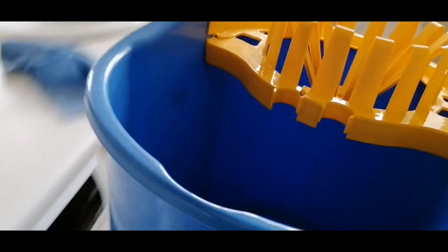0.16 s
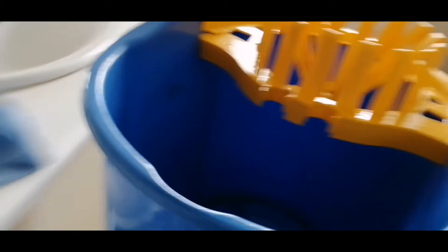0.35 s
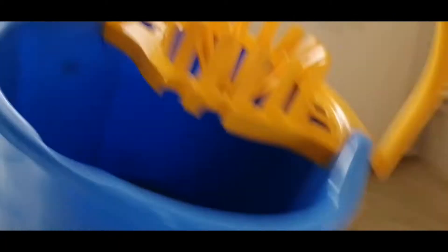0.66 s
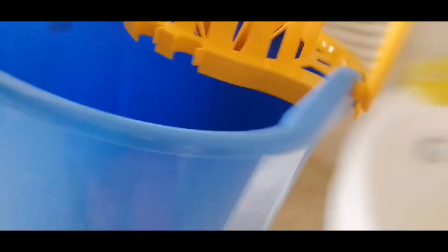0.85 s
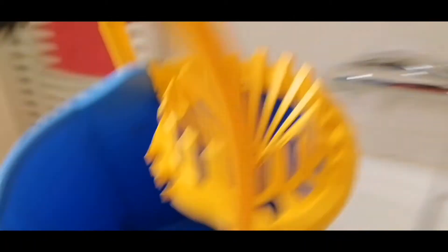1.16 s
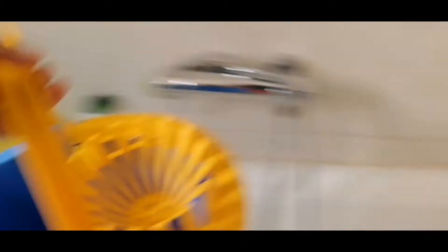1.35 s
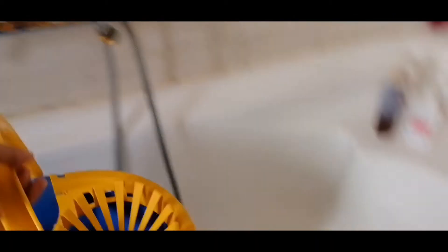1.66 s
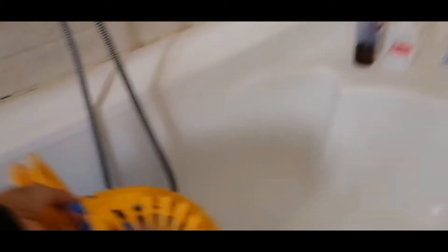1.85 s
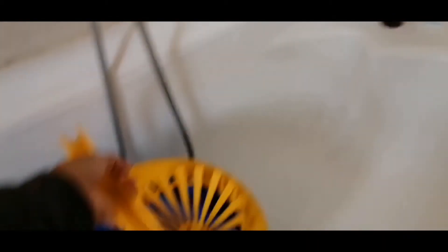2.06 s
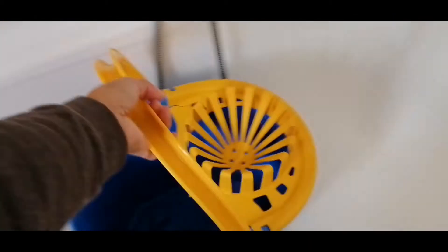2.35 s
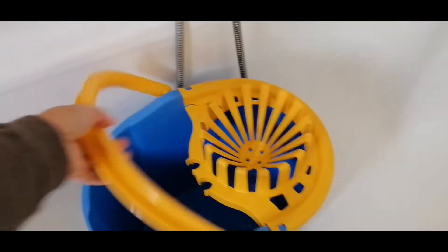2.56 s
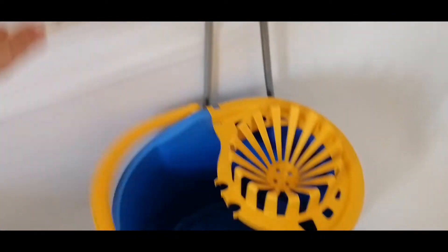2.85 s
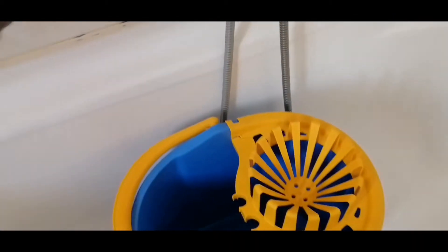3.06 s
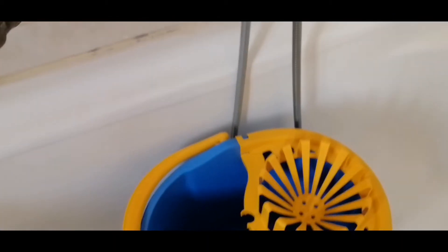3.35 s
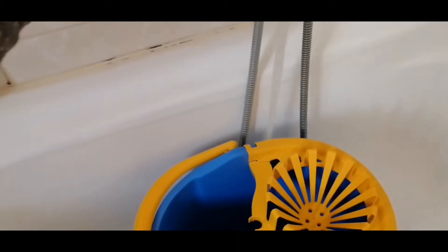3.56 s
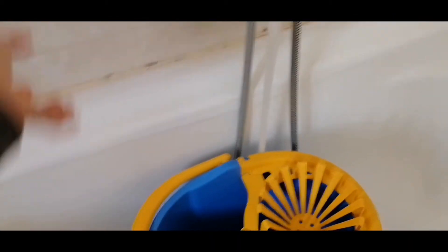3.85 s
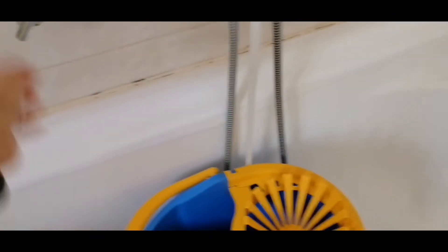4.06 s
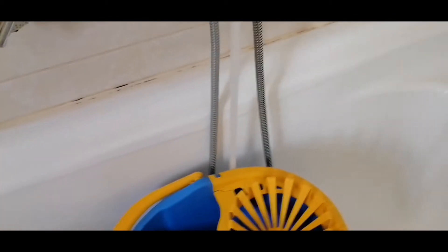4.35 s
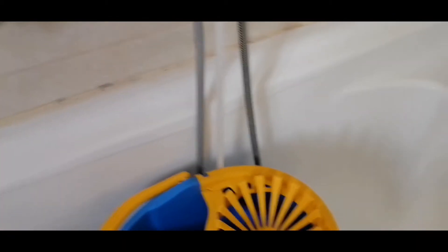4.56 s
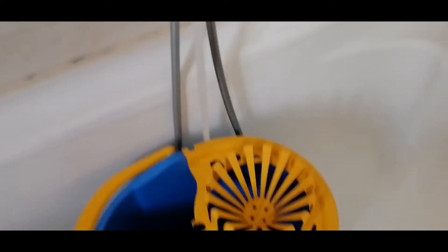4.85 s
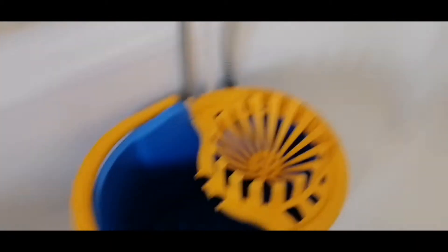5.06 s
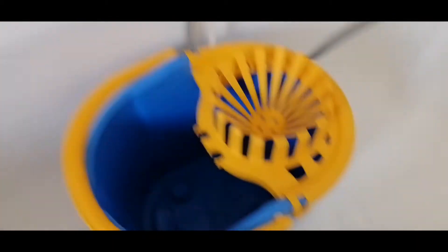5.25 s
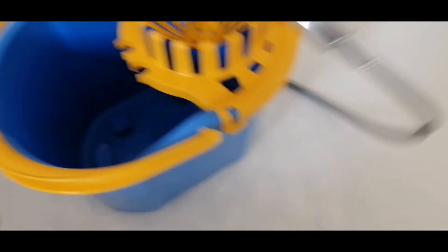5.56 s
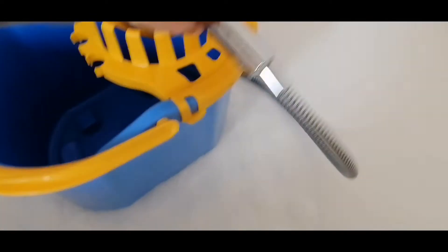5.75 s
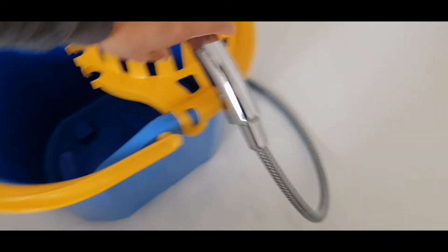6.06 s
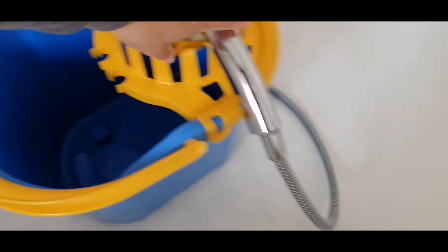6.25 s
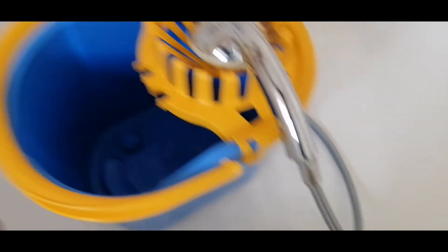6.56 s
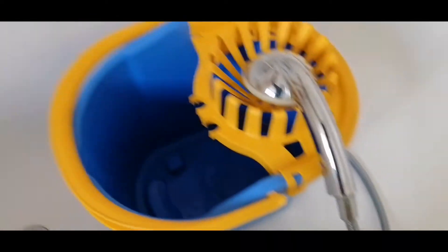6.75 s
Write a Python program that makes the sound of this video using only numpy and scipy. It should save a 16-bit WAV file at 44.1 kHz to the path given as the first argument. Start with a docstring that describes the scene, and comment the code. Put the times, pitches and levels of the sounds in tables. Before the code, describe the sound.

Hollow plastic knocks, rustling sleeves and a thin squeak, a bucket set into a booming tub, then sizzling shower spray with scrapes.

```python
"""A hand rumbles on a camera in a tiled bathroom as a plastic mop bucket is knocked and picked up, sleeves rustling.
It is bumped down into a bathtub, which booms, and its handle is dropped; each blow is a click, chatter and rings.
A tap lever clacks open and a jet of drops hisses and patters on the tub, while the bucket is shoved under
the shower hose with scrapes and a short groan. Two close microphones hear it all; the loudest blows are limited."""
import sys
import numpy as np
from scipy import signal
from scipy.fft import rfft, irfft, next_fast_len
from scipy.io import wavfile
from scipy.ndimage import uniform_filter1d, minimum_filter1d, map_coordinates

SR = 44100
rng = np.random.default_rng(int(sys.argv[2]) if len(sys.argv) > 2 else 0)


def output_pcm(signal):
    """Save a mono or channel-first signal as 16-bit PCM at the path in sys.argv[1].

    Samples are clipped to [-1, 1] before scaling.
    """
    pcm = np.clip(np.atleast_2d(signal).T, -1, 1) * 32767
    wavfile.write(sys.argv[1], SR, np.round(pcm).astype(np.int16))


N = 304290
TIME = np.arange(N) / SR  # seconds
SIDES = np.array([[.5], [-.5]])  # shares a left-minus-right level between the two microphones

# All dB columns are relative levels: each source sets its own trim.
# Hand shifts on the camera body. Each row: start in seconds, length in seconds, level in dB.
GRIP_SHIFTS = [(-0.05, 0.24, -29.5), (0.28, 0.18, -42), (3.92, 0.23, -26.5), (6.2, 0.11, -29)]
# Colour of the grip rumble. Each row: frequency in Hz, density in dB per Hz.
GRIP_COLOUR = [(12, -30), (20, 1.5), (76, 0.5), (161, -6), (195, -5.5), (269, -16.5), (350, -18),
               (460, -30), (770, -120)]
# Colour of the still room. Each row: frequency in Hz, density in dB per Hz.
HUSH_COLOUR = [(25, 24), (60, 21), (140, -27), (260, -19), (550, -22), (1200, 6), (4000, 1), (8000, -1),
               (15000, -3.5)]
# Blows on the bucket, its handle and the tap. Each row: start in seconds, first contact in dB, thump in dB,
# clack in dB, snap in dB, tick in dB, wall pitch in Hz, clack pitch in Hz, left minus right in dB,
# direct click against the echo in dB, chatter against the echo in dB, extra bass from the weight in dB.
BLOWS = [(0.012, -27, -30, -32, -45, -39.5, 284.4, 660, -3.5, -4.5, -5, 2),
         (0.099, -9, -30, -28, -35.5, -32, 339, 510, -4, 2.5, -0.5, -8),
         (0.515, -22, -33, -31, -44, -45, 320, 740, -3, 0, -8, 5),
         (0.598, 0, -32.5, -24, -21.5, -62, 292, 740, -3.5, -12, 0.5, -7),
         (1.04, -44, -31, -52, -52, -50, 264.6, 830, -3.5, -1, -3, 6.5),
         (1.083, -25, -29.5, -30, -48, -47, 286, 584, -3, -7, -10, -19),
         (1.15, -26, -47, -42, -32, -58, 326, 587, -3.5, -8, -8, 0),
         (1.657, -13, -9, -20, -22, -16, 275.2, 450, 1, -21, -5.5, 4.5),
         (2.136, -16, -17.5, -14, -27, -35, 261, 1050, 4, -17, 11, 17.5),
         (2.151, -6, -17, -8.5, -12.5, -23, 296, 790, 2.5, -8, 6, 7.5),
         (2.499, -13, -12, -11, -13, -18, 307, 1000, -2.5, -17, 6, 7),
         (2.961, -63, -63, -35.5, -40, -70, 288, 880, -3, 1, 1, 0),
         (3.016, -11, -9.5, -16, -17, -13, 263.5, 900, -0.5, -10, 5.5, -8.5),
         (3.294, -19, -28, -35, -36.5, -35.5, 264, 536, -2.5, -12, -1.5, -24),
         (3.456, -30, -63, -36, -54, -52, 312, 482, -3, -3, 0, -22),
         (3.502, -19, -41, -23, -20.5, -33, 274, 1010, 1, -7, 7, -14),
         (5.164, -19, -27.5, -30.5, -28, -26, 345, 573, 0, -10, 4, -3.5),
         (5.244, 2.5, -52, -20, -26.5, -36, 300, 870, 3, -17, 6, 1),
         (5.829, -24, -23.5, -27.5, -53, -38, 284, 604, -3, -13, -8, 1)]
# What a blow sets ringing, from the whole body (thump) to the hard edge (tick).
# Each row: frequency in Hz, density in dB per Hz.
THUMP_COLOUR = [(30, -9), (80, -3), (120, -1.5), (260, 3), (420, -7.5), (650, -8.5), (1500, -61)]
CLACK_COLOUR = [(250, -35), (480, 10), (750, 4), (1150, 4.5), (1600, 0), (2600, -48)]
SNAP_COLOUR = [(900, -46.5), (1700, 2), (2300, 3), (3100, 6.5), (3900, -7), (5000, -6), (8000, -72)]
TICK_COLOUR = [(2500, -13), (4200, -0.5), (5300, 3), (7200, 1.5), (10000, -3), (15000, -14)]
# Lasting rings of the bucket in the tub. Each row: frequency in Hz, level in dB, 60 dB decay in seconds.
BUCKET_MODES = [(113.4, -14.5, 1.2), (147.8, -15, 1.1), (182, -5.5, 1), (221.2, -6, 1.08), (269.5, -12, 1),
                (331, -7, 0.62), (364, -16.5, 1.26), (401, -12.5, 0.68), (574, -15, 0.82), (643, -21, 0.83),
                (684, -17, 0.84), (766, -9, 0.8), (873, -17.5, 0.55), (1032, -13.5, 0.63), (1110, -12, 0.7),
                (1220, -18, 0.42), (1332, -19, 0.97)]
# Sleeve and hand rubbing, and the bucket's base sliding as it lands.
# Each row: start in seconds, length in seconds, low rub in dB, swish in dB.
RUBBING_STROKES = [(0.257, 0.19, -33.5, -33), (0.423, 0.27, -32, -35.5), (1.145, 0.13, -55, -34),
                   (1.365, 0.31, -30, -38), (1.664, 0.034, -40, -16), (1.957, 0.22, -62, -28.5)]
# Colours of the low rub and of the swish. Each row: frequency in Hz, density in dB per Hz.
RUB_COLOUR = [(80, -16), (200, -1.5), (370, 1.5), (600, -7.5), (900, -16), (1900, -20), (2800, -15.5),
              (3600, -25), (6000, -48)]
SWISH_COLOUR = [(1500, -12), (2700, -7), (4000, -7.5), (5700, 0.5), (6300, -1.5), (7200, -1.5), (8300, -6),
                (10500, -11.5), (15000, -16)]
# The rocking bucket lands its weight on the tub floor. Each row: start in seconds, level in dB.
TUB_LANDINGS = [(1.65, -31), (1.76, -21.5), (2.13, -18), (2.28, -16), (2.56, -22), (2.74, -22.5),
                (3.08, -24), (5.15, -19), (5.85, -22.5)]
# The bucket slides on enamel. Each row: start in seconds, length in seconds, level in dB.
DRAGS = [(2.56, 0.2, -22.5), (4.87, 0.17, -36), (5.16, 0.072, -28), (5.67, 0.11, -24.5)]
# Colour of the scrape. Each row: frequency in Hz, density in dB per Hz.
SCRAPE_COLOUR = [(90, -20), (190, -9), (290, -1), (400, -10.5), (580, -5.5), (900, -16), (1400, -18.5),
                 (3200, -22), (6000, -50)]
# Colours of the fine drops, the heavy drops, and the air and water leaving the spout.
# Each row: frequency in Hz, density in dB per Hz.
SPRAY_COLOUR = [(2500, -25), (4100, -8), (5000, -1), (6000, 0), (8300, 0), (10000, -2.5), (12000, -6.5),
                (15000, -7.5)]
PATTER_COLOUR = [(120, -28), (250, -18), (400, -12), (560, -10), (700, -14.5), (820, -8.5), (1200, -9.5),
                 (1600, -9), (2200, -4.5), (2800, 1.5), (3300, 3.5), (3900, -1.5), (5000, -7.5),
                 (7000, -43)]
SPLUTTER_COLOUR = [(200, -23), (420, 5), (1100, -4), (1800, -6), (4000, -35)]
# Where the jet stands. Each row: time in seconds, left minus right in dB.
JET_SIDES = [(3.5, 2), (4.6, 1.1), (5.5, -0.5), (6.9, -1.8)]
# How long the tiled room rings. Each row: frequency in Hz, 60 dB decay in seconds.
TILE_DECAY = [(60, 2.04), (130, 0.9), (350, 0.71), (920, 0.79), (2500, 0.71), (6400, 0.61), (14000, 0.3)]
# How alike the two microphones hear. Each row: frequency in Hz, left-right likeness from 0 to 1.
LIKENESS = [(60, 0.52), (280, 0.93), (600, 0.16), (1200, 0), (4000, 0.037)]
# Resonances of the microphone ports. Each row: centre in Hz, half width in Hz, left in dB, right in dB.
PORT_RESONANCES = [(250, 610, 2, -2), (3080, 190, 0.5, -1.5), (5340, 34, 5.5, 6), (7100, 150, 4.5, -2),
                   (7160, 594, -2.5, 12), (8240, 1280, 7, -2), (15300, 540, 3, 3)]


def amp(db):
    """Decibels to gain."""
    return 10 ** (np.asarray(db) / 20)


def unit(x):
    """Scale to rms 1."""
    return x / np.sqrt(np.mean(x ** 2) + 1e-20)


def along(points, hz):
    """(Hz, value) points read on a log frequency axis."""
    f, v = np.transpose(points)
    return np.interp(np.log(hz + 1), np.log(f + 1), v)


def since(start):
    """Seconds since start for each sample, 0 before it."""
    return np.maximum(TIME - start, 0)


def wobble(rate):
    """A smooth random curve with this many knots a second."""
    knots = rng.standard_normal(int(N * rate / SR) + 4)
    return map_coordinates(knots, [np.arange(N) * rate / SR])


def filtered(x, response):
    """x times a response of frequency, with silence appended against wrap-around."""
    n = x.shape[-1]
    m = next_fast_len(n + 8192, real=True)
    spectrum = rfft(x, m) * response(np.fft.rfftfreq(m, 1 / SR))
    return irfft(spectrum, m)[..., :n]


def causal(gain):
    """The minimum-phase response with this gain."""
    cepstrum = irfft(np.log(gain + 1e-6))
    half = len(cepstrum) // 2
    folded = np.r_[cepstrum[0], 2 * cepstrum[1:half]]
    return np.exp(rfft(folded, len(cepstrum)))


def diffuse(pair):
    """Two unrelated signals as two close microphones hear them: alike mostly in the low range."""
    def mid_side(hz):
        turn = np.arccos(np.clip(along(LIKENESS, hz), -1, 1)) / 2
        return np.array([np.cos(turn), np.sin(turn)])
    mid, side = filtered(pair, mid_side)
    return np.array([mid + side, mid - side])


def coloured(pair, spectrum):
    """A diffuse stereo sound of rms 1 with this spectrum."""
    return unit(filtered(diffuse(pair), lambda hz: amp(along(spectrum, hz))))


def noise():
    """Two unrelated white noises."""
    return rng.standard_normal((2, N))


def grains(rate, spread_db):
    """Tiny impacts of uneven size at random moments, about rate a second, rms 1."""
    happens = rng.random((2, N)) < rate / SR
    return unit(happens * noise() * amp(spread_db * noise()))


def strokes(rows, swell, t60):
    """Gain of (start s, length s, dB) movements: each swells for a share of its length, holds and dies away."""
    power = 0
    for start, length, db in rows:
        rise = np.minimum(since(start) / (swell * length), 1)
        power = power + (amp(db - 60 * since(start + length) / t60) * rise) ** 2
    return np.sqrt(power)


def room_tail():
    """A fresh one-second stereo echo of the tiled room, energy 1 a side; each band decays at its own rate."""
    hz, t, z = signal.stft(rng.standard_normal((2, SR)), SR, nperseg=256)
    decay = amp(-60 * t / along(TILE_DECAY, hz)[:, None])
    tail = signal.istft(z * decay, SR, nperseg=256)[1][:, :SR]
    return unit(diffuse(tail)) / np.sqrt(SR)


def with_echo(x, wet_db):
    """x and the room's answer to it, scaled to keep the total power."""
    echo = signal.fftconvolve(x, room_tail(), axes=1)[:, :N]
    return (x + amp(wet_db) * echo) / np.hypot(1, amp(wet_db))


def background(grip_db=-1, hush_db=-52):
    """Fingers rumble on the camera body over the faint hush of the room: both are shaped noise."""
    grip = strokes(GRIP_SHIFTS, swell=0.15, t60=0.3) * coloured(noise(), GRIP_COLOUR)
    return amp(grip_db) * grip + amp(hush_db) * coloured(noise(), HUSH_COLOUR)


def excitation(t, click_db, chatter_db, chatter_t60=0.11, echo_delay=0.0054):
    """A direct click, a short chatter of loose plastic, and the nearest walls answering a few ms later."""
    chatter = diffuse(rng.standard_normal((2, SR))) * amp(-60 * t / chatter_t60)
    echo = room_tail() * np.clip(t / echo_delay - 1, 0, 1)
    return amp(click_db) * (t == 0) + amp(chatter_db) * chatter / np.linalg.norm(chatter[0]) + echo


def bucket_rings(t, thump, clack, heavy, modes_db=-3, detune=0.00827):
    """Decaying modes of the bucket: soft, heavy blows feed the low ones, hard blows the upper ones."""
    hz, db, t60 = np.transpose(BUCKET_MODES)
    fading = amp(db[:, None] - 60 * t / t60[:, None])
    # the bucket sits a little differently at each blow, which shifts its modes
    shifted_hz = hz * (1 + detune * rng.standard_normal(len(hz)))
    rings = np.sin(2 * np.pi * np.outer(shifted_hz, t)) * fading
    force = amp(modes_db + np.where(hz < 500, thump, clack) + heavy(hz) + rng.normal(0, 1.0, len(hz)))
    return (force * rng.choice([-1, 1], len(force))) @ rings


def knocks(direct_db=-8, chatter_db=-3, wall_db=-1, wall_t60=0.65,
           thump_db=-1, clack_db=-1, snap_db=-1, tick_db=-5,
           focus_db=7, focus_width=0.24, crack_db=4, crack_time=0.00018, start_delay=0.0015):
    """Each blow is a click, a short chatter of loose plastic, the ringing bucket and the room's answer."""
    out, t = np.zeros((2, N + 2 * SR)), np.arange(SR) / SR
    early = slice(SR // 25)  # the first 40 ms set the level of each part
    for s, peak, thump, clack, snap, tick, wall_hz, clack_hz, pan, click, loose, weight in BLOWS:
        def heavy(hz):  # the whole bucket's mass behind a blow changes the bass, in dB
            return weight / (1 + (hz / 180) ** 6)

        def spot(hz):  # the spot that is struck has a broad resonance of its own, in dB
            return focus_db / (1 + (np.log((hz + 1) / clack_hz) / focus_width) ** 2)

        blow = excitation(t, direct_db + click, chatter_db + loose)
        wall = amp(thump + wall_db) * np.sin(2 * np.pi * wall_hz * t) * amp(-60 * t / wall_t60)
        onset = 1 - np.exp(-t / 0.00054)
        hit = (wall + bucket_rings(t, thump, clack, heavy)) * onset
        for spectrum, db in ((THUMP_COLOUR, thump + thump_db), (CLACK_COLOUR, clack + clack_db),
                             (SNAP_COLOUR, snap + snap_db), (TICK_COLOUR, tick + tick_db)):
            part = filtered(blow, lambda hz: causal(amp(along(spectrum, hz) + spot(hz) + heavy(hz))))
            hit = hit + amp(db) * part / part[:, early].std()
        # first contact: one sharp push and pull of air
        u = t / crack_time
        hit = hit + amp(peak + crack_db) * u * (2 - u) * np.exp(-u)
        # each blow sounds a fixed short time after its listed start
        begin = round((s + start_delay) * SR)
        out[:, begin:begin + SR] += hit * amp(pan * SIDES)
    return out[:, :N]


def squeak(level_db=-27, start=1.465, rise=0.026, t60=0.72, top_hz=5600,
           climb_hz_per_s=7100, sag_hz_per_s=2700, rough=0.0203, catch_db=3.5, catch_hz=19.0):
    """A thin, rough squeak from one quick stroke climbs to its top pitch, then sags and fades."""
    t, past_top = since(start), since(start + rise)
    climb = climb_hz_per_s * np.maximum(rise - t, 0)
    sag = sag_hz_per_s * np.minimum(past_top, t60)
    pitch = (top_hz - climb - sag) * (1 + rough * np.array([wobble(1000), wobble(1000)]))
    catch = catch_db * np.cos(2 * np.pi * catch_hz * (t - rise))  # the surface grips in waves
    gain = amp(level_db + catch - 60 * past_top / t60) * np.minimum(t / rise, 1)
    return gain * np.sin(2 * np.pi * np.cumsum(pitch, axis=1) / SR)


def rubbing(swish_db=-1, catch_db=2):
    """Sleeve, hand and the landing base rub: shaped noise below, fine grains above, and a thin gliding squeak."""
    start, length, low, high = np.transpose(RUBBING_STROKES)
    low_gain = strokes(zip(start, length, low), swell=0.5, t60=0.22)
    high_gain = strokes(zip(start, length, high), swell=0.5, t60=0.22)
    catch = unit(amp(catch_db * wobble(45.55)))  # the rubbing surfaces catch and let go
    rub = low_gain * coloured(noise(), RUB_COLOUR)
    swish = amp(swish_db) * high_gain * coloured(grains(rate=8000, spread_db=2), SWISH_COLOUR)
    return with_echo(catch * (rub + swish), wet_db=-9) + with_echo(squeak(), wet_db=-6)


def tub(boom_db=2, boom_hz=59.4, rise=0.033, t60=1.14, waver=0.14, beat_hz=9, beat_depth=0.29):
    """The lowest mode of the tub floor swells after each landing and rings on, beating with a close second mode."""
    power = 0
    for s, db in TUB_LANDINGS:
        t = since(s)
        power = power + (amp(db - 60 * t / t60) * (1 - np.exp(-t / rise))) ** 2
    phase = 2 * np.pi * boom_hz * TIME + waver * wobble(11)  # radians
    second_mode = beat_depth * np.sin(phase + 2 * np.pi * beat_hz * TIME)
    return amp(boom_db) * np.sqrt(power) * unit(np.sin(phase) + second_mode)


def drag(scrape_db=-2):
    """The base scrapes over the enamel in small slips."""
    slips = coloured(grains(rate=1100, spread_db=0), SCRAPE_COLOUR)
    sliding = strokes(DRAGS, swell=0.36, t60=0.35)
    return with_echo(amp(scrape_db) * sliding * slips, wet_db=-6.5)


def drops(rate, spread_db, clumps, wet_db, wash_db, spectrum):
    """Drops at the heart of the jet share one echo; those that scatter merge into a smooth wash."""
    heart = with_echo(grains(rate, spread_db) * clumps, wet_db)
    return coloured(heart + amp(wash_db) * noise(), spectrum)


def water(tap_s=3.505, travel_s=0.34, spray_db=-17, patter_db=-25, splutter_db=-31):
    """The jet breaks into thousands of drops a second: fine ones sizzle, heavy ones patter on the tub."""
    t = since(tap_s)
    closed = np.maximum(1 - t / travel_s, 0)  # the flow swells to full while the lever travels
    spurt = 6.5 * amp(-60 * t / 0.33)  # dB: the pent-up pressure gives a first spurt
    nearing = 0.5 * t  # dB: the camera leans in and the spray grows
    spray = amp(spray_db - 14.5 * closed + spurt + nearing + 0.38 * wobble(13))
    patter = amp(patter_db - 10.5 * closed + spurt + 0.5 * wobble(18))
    clumps = amp(1.38 * wobble(60))  # the jet arrives in uneven slugs
    fine = drops(6000, 1, clumps, wet_db=-2, wash_db=-1, spectrum=SPRAY_COLOUR)
    heavy = drops(1700, 0, clumps, wet_db=3, wash_db=-3, spectrum=PATTER_COLOUR)
    # air and water leave the spout together
    bursts = coloured(grains(rate=880, spread_db=4), SPLUTTER_COLOUR)
    splutter = strokes([(tap_s, 0.1, splutter_db)], swell=0.49, t60=0.42) * bursts
    side = amp(np.interp(TIME, *np.transpose(JET_SIDES)) * SIDES)
    return (t > 0) * side * (spray * fine + patter * heavy + splutter)


def judder(start=5.768, end=5.82, groan_hz=275, level_db=-12, wet_db=-10, pan_db=3):
    """Shoved along, the base briefly sticks and slips in step: a short low groan, modelled as one sine."""
    held = np.clip(np.minimum(TIME - start, end - TIME) / 0.012, 0, 1)  # 12 ms fades
    groan = held * unit(np.sin(2 * np.pi * groan_hz * TIME))
    echo = signal.fftconvolve(groan[None], room_tail(), axes=1)[:, :N]
    wet = amp(wet_db) * groan.std() * unit(echo)
    return amp(level_db) * (groan * amp(pan_db * SIDES) + wet)


def scene():
    """Hand, bucket, rubbing, tub and water in the bathroom."""
    return background() + knocks() + rubbing() + tub() + drag() + water() + judder()


def record(dry, ceiling=1.15, hold=0.02, top_hz=15180):
    """Each microphone port has its own resonances; a limiter and a hard ceiling hold the peaks."""
    def ports(hz):
        db = 0
        for centre, width, left, right in PORT_RESONANCES:
            db = db + np.array([[left], [right]]) / (1 + ((hz - centre) / width) ** 2)
        return amp(db)
    x = filtered(dry, ports)
    needed = np.minimum(1, ceiling / (np.abs(x).max(axis=0) + 1e-9))
    span = int(hold * SR) + 3
    held = minimum_filter1d(needed, size=span, origin=(span - 1) // 2)  # the gain stays down after each peak
    limited = np.clip(x * uniform_filter1d(held, size=128), -1, 1)
    return filtered(limited, lambda hz: hz < top_hz)  # nothing is kept above the top frequency


dry = scene()
out = record(dry)
output_pcm(out)
```